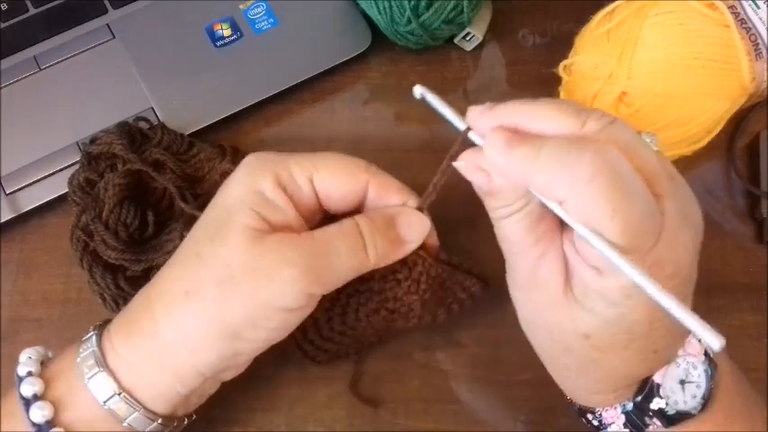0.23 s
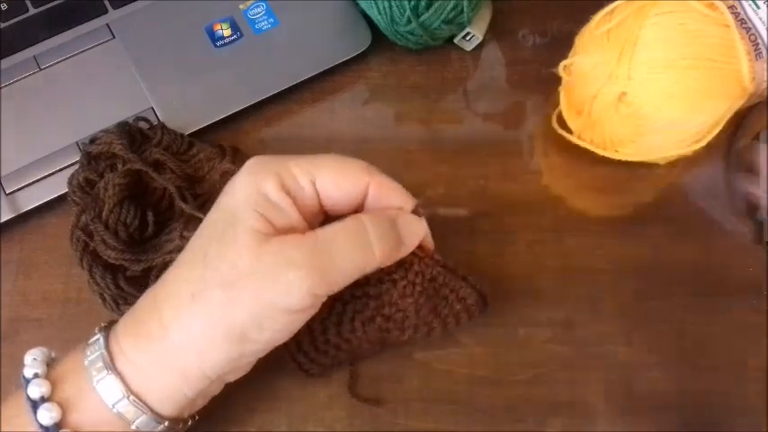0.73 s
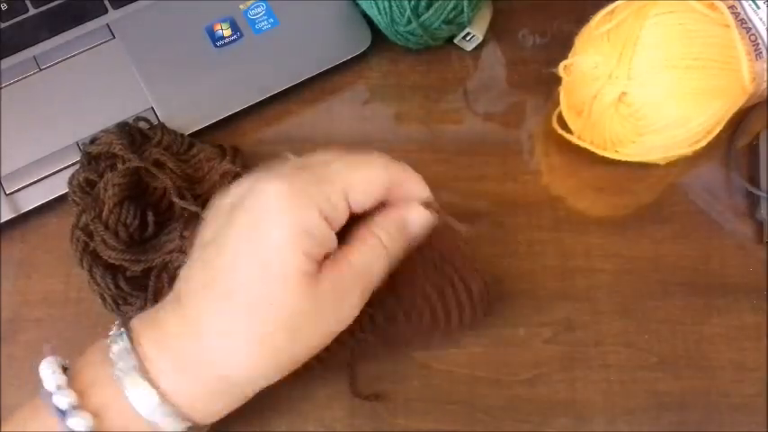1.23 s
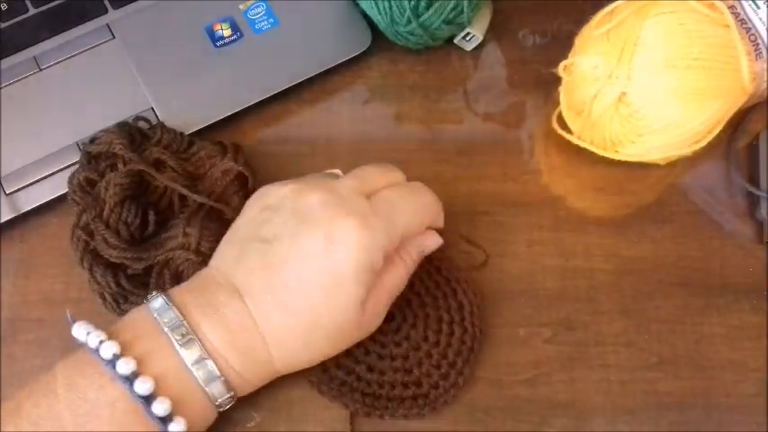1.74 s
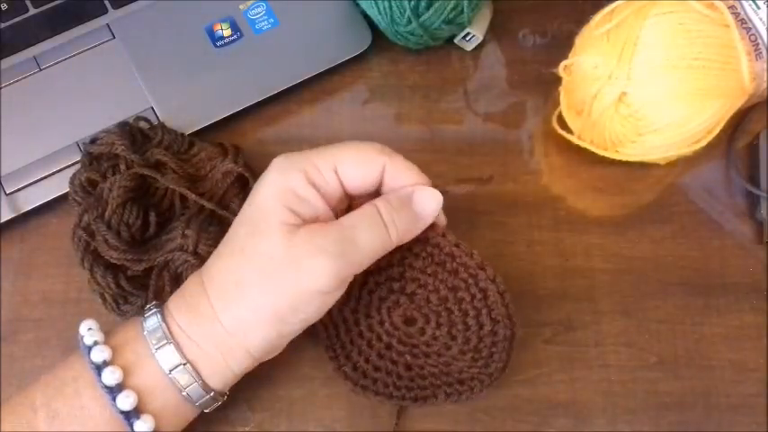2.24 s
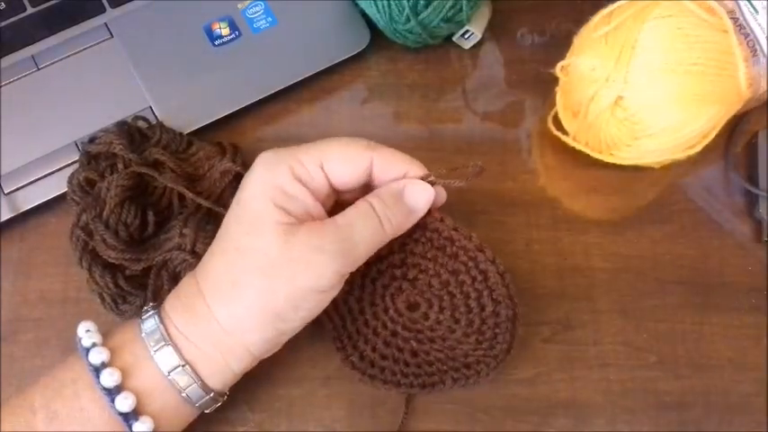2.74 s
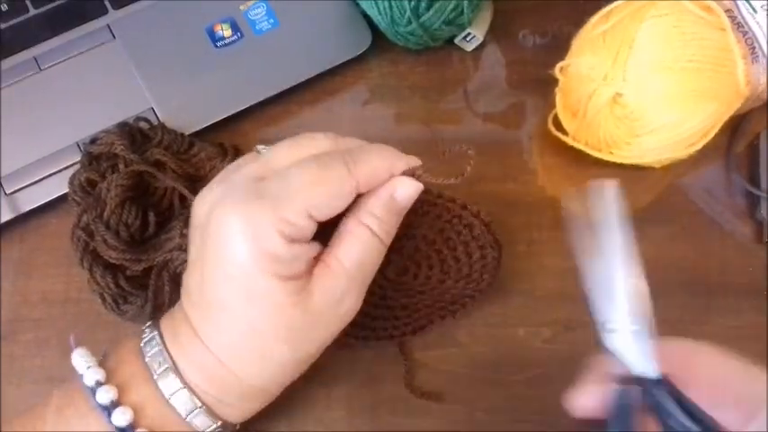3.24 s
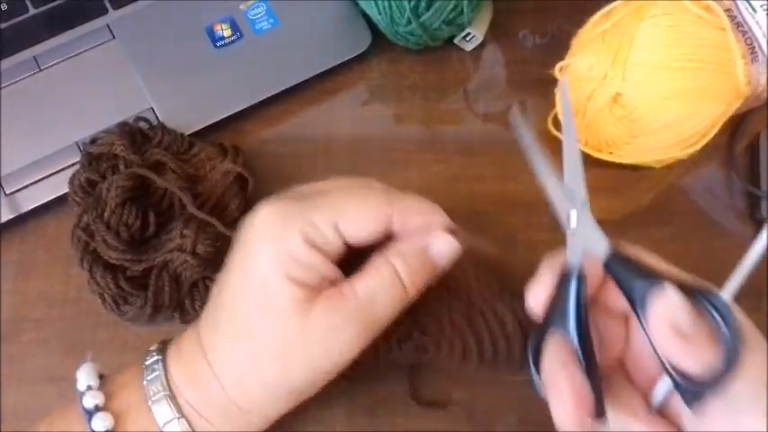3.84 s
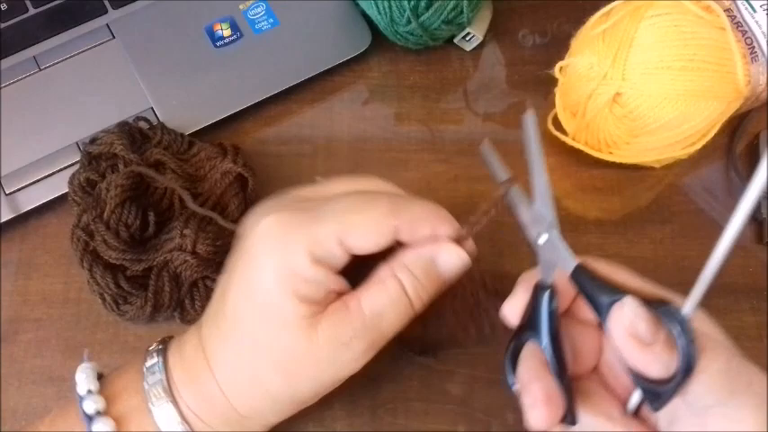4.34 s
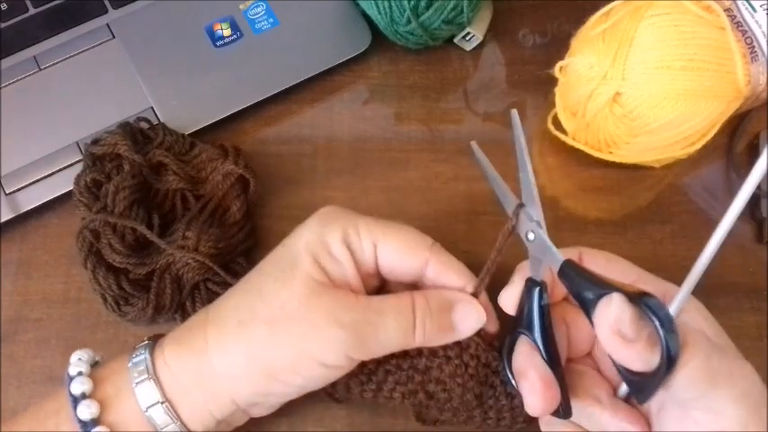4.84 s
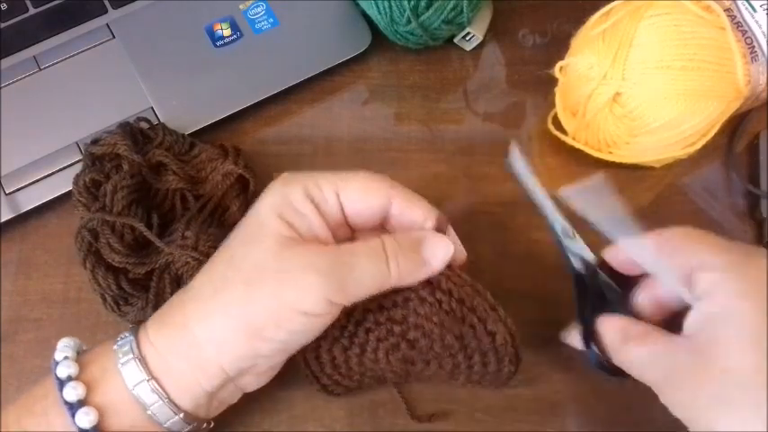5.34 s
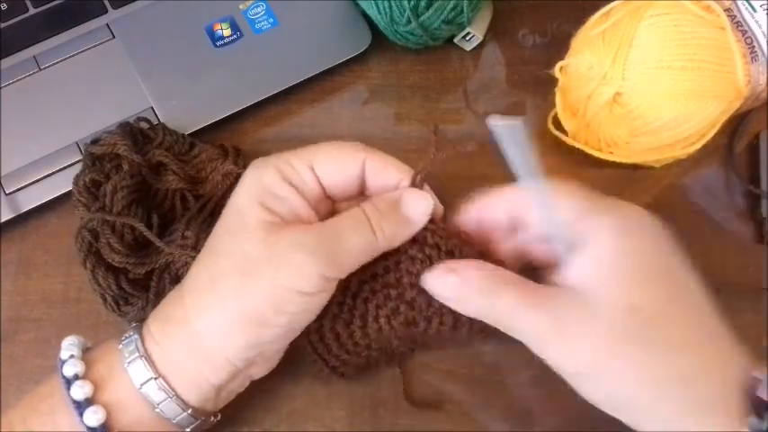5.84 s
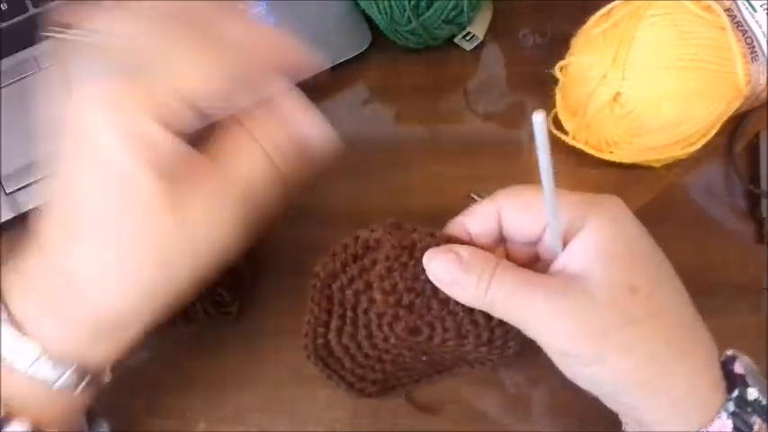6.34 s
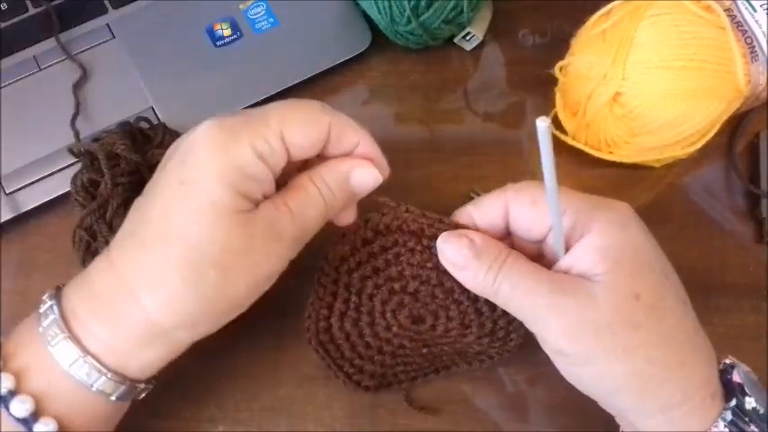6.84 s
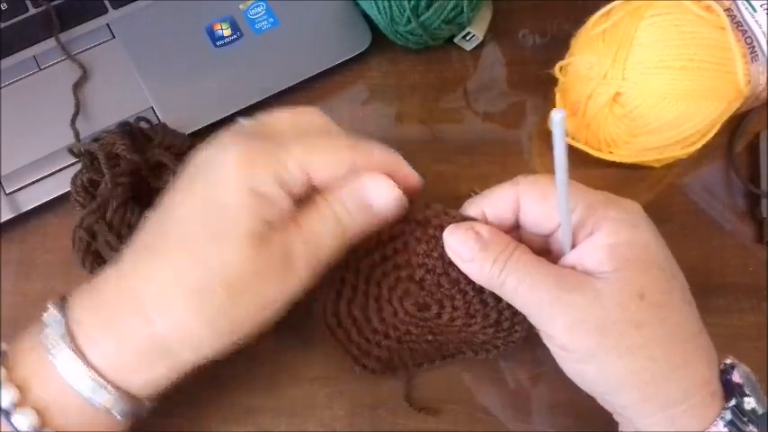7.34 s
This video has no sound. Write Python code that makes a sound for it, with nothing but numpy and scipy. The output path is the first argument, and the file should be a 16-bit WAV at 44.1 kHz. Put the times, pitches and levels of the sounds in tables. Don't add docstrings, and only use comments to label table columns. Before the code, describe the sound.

Close steel clatter in a cup, a hiss as scissors slide out, tiny blade clicks through yarn, and a sharp knock on wood.

```python
import sys
import numpy as np
from scipy import signal
from scipy.fft import rfft, irfft, next_fast_len
from scipy.io import wavfile
from scipy.ndimage import map_coordinates

SR = 44100
rng = np.random.default_rng(int(sys.argv[2]) if len(sys.argv) > 2 else 0)


def pcm_store(signal):
    levels = np.round(np.clip(np.atleast_2d(signal), -1, 1) * 32767)
    wavfile.write(sys.argv[1], SR, levels.astype(np.int16).T)


def elevation(decibels):
    levels = np.asarray(decibels, float)
    return 10 ** (levels / 20)


N = 334719


def unit(x):
    return x / np.sqrt(np.mean(x ** 2) + 1e-20)


def along(points, hz):
    f, value = np.transpose(points)
    return np.interp(np.log(hz + 1), np.log(f + 1), value)


def gain(rows):
    s, db = np.transpose(rows)
    return elevation(np.interp(np.arange(N) / SR, s, db, -140, -140))


def filtered(x, response):
    m = next_fast_len(x.shape[-1] + 8192)
    spectrum = rfft(x, m) * response(np.fft.rfftfreq(m, 1 / SR))
    return irfft(spectrum, m)[..., :x.shape[-1]]


def wobble(rate):
    knots = rng.standard_normal(int(N * rate / SR) + 4)
    return map_coordinates(knots, [np.arange(N) * rate / SR])


def add(track, s, sound):
    track[round(s * SR):][:len(sound)] += sound


def ring(hz, db, t60, chatter_s, blow, crack):
    t = np.arange(int(0.3 * SR)) / SR
    uneven_db = 2.0 * rng.standard_normal((len(hz), 1))
    level = elevation(db[:, None] + uneven_db - 60 * t / t60[:, None])
    modes = (level * np.sin(2 * np.pi * hz[:, None] * t)).sum(0)

    def colour(f):
        below = np.clip(f / hz[0], 0, 1) ** 3
        above = np.clip(hz[-1] / (f + 1), 0, 1) ** 4
        return elevation(along(np.transpose([hz, db]), f)) * below * above

    snap = unit(filtered(rng.standard_normal(len(t)), colour)) * elevation(-60 * t / 0.0069)
    onset = 1 - np.exp(-(t / 0.0005) ** 2)
    body = (modes / np.abs(modes).max() + crack * snap) * onset

    part = np.clip(t / max(chatter_s, 0.001), 0, 1)
    swell = (1 - part) ** 0.9 if blow else np.sin(np.pi * part)
    contacts = rng.standard_normal(len(t)) * (rng.random(len(t)) < 0.07)
    contacts *= swell * 0.13
    contacts[0] = blow
    sound = signal.fftconvolve(contacts, body)[:len(t)]
    return sound / (np.abs(sound).max() + 1e-9)


def strikes(table, modes, focus_db, damping, blow, crack, low_db, bright_db, chatter_s):
    usual_db, low_fades = -37, 0.41
    focus_octaves = 0.06
    track = np.zeros(N + SR)
    hz, db, t60 = np.transpose(modes)
    for s, peak_db, strongest_hz, *colour in table:
        hollow_db, hard_db = colour or (0, 0)
        near = focus_db * np.exp(-(np.log2(hz / strongest_hz) / focus_octaves) ** 2)
        low = low_db + hollow_db - low_fades * (peak_db - usual_db)
        bright = np.where(hz > 6000, bright_db + hard_db, 0)
        tilt = np.where(hz < 2500, low, bright)
        start = s - (1 - blow) * 0.4 * chatter_s
        sound = ring(hz, db + near + tilt, damping * t60, chatter_s, blow, crack)
        add(track, start, elevation(peak_db) * sound)
    return track[:N]


def grainy(spectrum, rough_db):
    clumps_db = rough_db * wobble(30) + 0.56 * rough_db * wobble(400)
    grains = rng.standard_normal(N) * elevation(clumps_db)
    return unit(filtered(grains, lambda f: elevation(along(spectrum, f)) * (f > 200)))


def strokes(rows):
    t = np.arange(N) / SR
    return sum(elevation(db - 12.5 * ((t - s) / half_s) ** 2) for s, half_s, db in rows)


# pitch_hz, level_db, t60_s
CUP_MODES = [(1530, 0, 0.029), (1658, -7, 0.11), (2170, -3.5, 0.13), (2927, -8.5, 0.11), (3020, 1, 0.045),
             (3190, -8.5, 0.12), (3590, 3, 0.058), (4100, -7, 0.094), (4150, 3, 0.05), (4240, -5.5, 0.081),
             (4386, -1, 0.055), (4980, -10, 0.042), (5480, -9, 0.049), (6965, -13.5, 0.013),
             (7820, -18.5, .05), (8540, -27, 0.065), (8950, -20.5, 0.027), (11860, -29.5, 0.024),
             (12900, -28.5, .03), (14710, -36.5, .03)]
# start_s, peak_db, strongest_hz, hollowness_db, hardness_db
CLINKS = [(1.2979, -20.5, 4110, -5.5, -10.5), (1.3049, -14.5, 4240, 5, 1.5), (1.3085, -24, 3950, 0, 11.5),
          (1.3124, -18, 4175, 7, -5), (1.319, -31.5, 1658, 5, -9), (1.4057, -31, 4150, 0, -20.5),
          (1.4166, -31.5, 4080, 2, -5), (1.5609, -35, 2160, -11, -6), (2.2522, -48, 4140, -3.5, 5.5),
          (2.2972, -47, 3590, 3, -1), (2.3976, -21.5, 3020, 4, 3.5), (2.411, -26.5, 3020, 1, -2),
          (2.4454, -20.5, 3200, -5, -13), (2.4662, -22, 4080, 8.5, -5), (2.5885, -13.5, 3057, 5.5, 5),
          (2.6803, -26.5, 3020, 6.5, 6), (3.3232, -42, 4400, -13, -2.5), (3.3348, -35.5, 4000, -16, 11)]


def clinks():
    return strikes(CLINKS, CUP_MODES, focus_db=12, damping=0.62, blow=0.93, crack=0.28,
                   low_db=1, bright_db=2, chatter_s=0.022)


# start_s, peak_db, strongest_hz
SCRAPES = [(1.268, -38.5, 4020), (1.281, -34, 4030), (1.3294, -49, 4160), (1.3494, -41.5, 3840),
           (1.3644, -43, 4500), (1.372, -45.5, 4400), (1.4294, -35.5, 4060), (1.443, -35, 4170),
           (1.4551, -21, 4260), (1.4621, -25, 4370), (1.5194, -50, 4500), (1.5894, -43, 4030),
           (1.6774, -49, 4620), (1.6881, -37.5, 4250), (1.757, -41, 2970), (1.777, -31, 4200),
           (1.785, -49.5, 3020), (2.0837, -53, 3880), (2.1226, -56, 4440), (2.1575, -45.5, 4070),
           (2.1894, -52, 4000), (2.2044, -52.5, 4110), (2.6244, -38, 3030), (2.69, -39, 3020),
           (2.824, -46, 4000)]


def scrapes():
    return strikes(SCRAPES, CUP_MODES, focus_db=13.5, damping=0.58, blow=0, crack=0.88,
                   low_db=-3.0, bright_db=-5.5, chatter_s=0.023)


# start_s, peak_db, strongest_hz
TAPS = [(0.1997, -61, 1960), (0.6786, -58, 3910), (1.3907, -27, 4120), (1.506, -32, 3750),
        (2.368, -47, 4100), (2.5446, -35.5, 4150), (2.569, -35.5, 4100), (2.6054, -23.5, 3160),
        (3.052, -53, 3600), (4.5236, -49.5, 3600), (4.7696, -55, 3630), (5.6025, -27.5, 2160)]


def taps():
    return strikes(TAPS, CUP_MODES, focus_db=6.5, damping=0.13, blow=0.9, crack=0.13,
                   low_db=-3.5, bright_db=-2.0, chatter_s=0.00396)


# time_s, level_db
STIRRING = [
    [(1.25, -75.5), (1.316, -79), (1.436, -53), (1.468, -62.5), (1.596, -63.5), (1.76, -65), (1.85, -84)],
    [(2.05, -68.5), (2.152, -68), (2.302, -66.5), (2.416, -60.5), (2.532, -55.5), (2.568, -58),
     (2.724, -65.5), (2.874, -66.5), (2.95, -85)],
]
# loudest_s, half_length_s, level_db
DRAWN = [
    (1.46, 0.2, -75.5),
    (2.72, 0.173, -71.5),
]
# pitch_hz, level_db per Hz
STEEL_SLIDE = [(2940, -40), (5000, -7), (6440, -11.5), (6960, 4), (7480, -2.5), (9960, -14.5),
               (11200, -12.5), (12800, -4), (15700, -21)]
# pitch_hz, level_db per Hz
RUB = [(400, 0), (1500, -9), (2800, -9), (4100, -2), (4800, -10), (6000, -25), (12000, -44.5)]


def rummage():
    stir = sum(gain(rows) for rows in STIRRING)
    jolts_db = 14 * rng.random(N) * (rng.random(N) < 0.02)
    chatter = unit(rng.standard_normal(N) * elevation(jolts_db))

    def cup(f):
        total = 0
        for centre, db, t60 in CUP_MODES:
            width = 5 / t60
            total = total + elevation(db) * 1j * f * width / (centre * centre - f * f + 1j * f * width)
        return total

    rattle = filtered(chatter * stir, cup) / np.std(filtered(chatter, cup))
    hiss = strokes(DRAWN) * grainy(STEEL_SLIDE, rough_db=1.3)
    rub = stir * elevation(-5) * grainy(RUB, rough_db=3)
    return elevation(-9) * rattle + rub + hiss


# start_s, peak_db, pitch_hz
THUDS = [(1.267, -53, 488), (1.308, -53.5, 280), (1.405, -58, 630), (1.458, -56.5, 455), (1.558, -54, 298),
         (1.742, -58, 473), (2.089, -61, 411), (2.14, -59, 200), (2.393, -60.5, 285), (2.457, -52.5, 777),
         (2.551, -57, 121), (2.589, -54.5, 197), (2.847, -66.5, 163), (5.605, -52, 284)]


def thuds():
    track, t = np.zeros(N + SR), np.arange(int(0.2 * SR)) / SR

    def dull(f):
        return 1 / (1 + (130 / (f + 1)) ** 2) / (1 + (f / 700) ** 2)

    for s, db, hz in THUDS:
        puff = unit(filtered(rng.standard_normal(len(t)), dull))
        envelope = elevation(db - 4 - 60 * t / 0.17) * (1 - np.exp(-t / 0.0021))
        note = np.sin(2 * np.pi * hz * t)
        add(track, s, envelope * (1.2 * note + 1.44 * puff))
    return track[:N]


# pitch_hz, level_db, t60_s
BLADE_MODES = [(1858, 0, 0.11), (2800, 1.5, 0.044), (3450, 1, 0.095), (3750, -4, 0.25), (4100, 3, 0.065),
               (4416, -6, 0.12), (4620, -12, 0.22), (5640, -35.5, .05), (7450, -28, 0.033),
               (7060, -16, 0.25), (11330, -18, 0.15), (13460, -15.5, .06)]
# start_s, peak_db, strongest_hz
TICKS = [
    (2.8459, -43, 4530),
    (2.9108, -56.5, 3600),
]


def ticks():
    return strikes(TICKS, BLADE_MODES, focus_db=14, damping=0.44, blow=1, crack=0.45,
                   low_db=-4.5, bright_db=7.5, chatter_s=0.012)


# start_s, peak_db, strongest_hz
SNIPS = [(3.2594, -64.5, 3750), (3.7564, -52, 4060), (3.8394, -58.5, 3680), (3.8591, -59.5, 4110),
         (3.8851, -65, 4090), (3.9135, -63, 3400), (4.0094, -63, 4110), (4.4638, -48.5, 4120),
         (4.7386, -52, 4400), (5.1133, -54, 3450)]


def snips():
    return strikes(SNIPS, BLADE_MODES, focus_db=12, damping=0.24, blow=0.72, crack=0.92,
                   low_db=-14, bright_db=-9, chatter_s=0.015)


# start_s, pitch_hz, level_db, t60_s
PING = [
    (2.606, 10600, -62, .33),
]


def ping():
    t = np.arange(N) / SR
    track = np.zeros(N)
    for s, hz, db, t60 in PING:
        track += elevation(db - 60 * abs(t - s) / t60) * (t > s) * np.sin(2 * np.pi * hz * t)
    return track


# loudest_s,
# half_length_s, level_db
HANDS = [
    (.68, .15, -66.5),
    (3.29, 0.15, -72),
    (3.87, .17, -72),
    (4.5, .1, -73),
    (4.75, 0.16, -73),
    (5.08, 0.11, -73),
    (6.3, 0.17, -76.5),
]
# pitch_hz, level_db per Hz
YARN = [(400, -30), (1800, -16), (3000, -5), (3900, 0), (4600, -4), (5400, -22), (12000, -45)]


def hands():
    return elevation(-5) * strokes(HANDS) * grainy(YARN, rough_db=5)


# start_s, peak_db, wood_db, brightness_db, crack_t60_s
LAID = [
    (5.6011, -23.5, -18, -36, 0.039),
    (5.6694, -19, -10.5, -27.5, 0.019),
    (5.672, -10.5, -31.5, -33, 0.059),
    (5.687, -17.5, -13.5, -43, 0.045),
    (5.6983, -28, -7.5, -35.5, 0.084),
]
# pitch_hz, level_db, t60_s
TABLE_MODES = [(437, -14, 0.13), (600, -16.5, 0.1), (1070, -15.0, 0.11), (1255, -25.5, 0.4),
               (1570, -21.5, 0.27), (2515, -18.5, 0.081), (2850, -6, 0.11), (3187, -15.5, 0.28),
               (3297, 2, 0.04), (3796, 0.5, 0.098), (3903, -12, 0.14), (3998, -1, 0.14),
               (4194, -5.5, 0.1445), (4600, 2.5, 0.093), (4250, -13.5, 0.19), (4540, 7.0, 0.12),
               (2240, -16.5, .06), (4570, -17, 0.034), (7400, -29.5, .04)]
# pitch_hz, level_db per Hz
CRACK = [(88, -68.5), (150, -38.5), (609, -20.5), (784, -20), (1490, -14.5), (1850, -16.5), (2380, -19.5),
         (3250, -4.5), (4100, 0), (4790, -7.5), (5930, -38), (8100, -29.5), (15700, -63)]


def laid_down():
    track, t = np.zeros(N + SR), np.arange(int(0.3 * SR)) / SR
    hz, level, t60 = np.array(sorted(TABLE_MODES)).T
    choked_t60 = 0.22 * np.clip(t60, 0.02, 0.15)
    for s, db, wood_db, bright_db, crack_t60 in LAID:
        def tilt(f):
            bright = (bright_db + 35.5) * np.clip((f - 4900) / 1500, 0, 1)
            return np.where(f < 1400, wood_db + 24, bright)

        noise = rng.standard_normal(len(t))
        crack = unit(filtered(noise, lambda f: elevation(along(CRACK, f) + tilt(f))))
        crack *= elevation(-60 * t / abs(crack_t60)) * (1 - np.exp(-(t / 0.001) ** 2))
        modes = ring(hz, level + tilt(hz), choked_t60, chatter_s=0.007, blow=0.91, crack=0.399)
        add(track, s, elevation(db) * (0.52 * modes + 0.53 * crack))
    return track[:N]


# pitch_hz, t60_s
WALLS = [(200, 1), (1000, 0.9), (4000, 0.47), (8000, 0.45), (14000, 0.3)]


def room(x):
    wet, hop = np.zeros((2, N + 2 * SR)), SR // 3
    for start in range(0, N, hop):
        common, apart = rng.standard_normal(SR // 2), rng.standard_normal(SR // 2)
        pair = [common + 0.065 * apart, common - 0.044 * apart]
        hz, t, z = signal.stft(pair, SR, nperseg=256)
        t60 = along(WALLS, hz)[:, None]
        next_room = elevation(-25 - 60 * t / (2.4 * t60))
        decay = elevation(-60 * t / t60) + next_room
        tail = signal.istft(z * decay, SR, nperseg=256)[1]
        tail = tail / np.linalg.norm(tail[0])
        piece = signal.fftconvolve(x[None, start:start + hop], tail, axes=1)
        wet[:, start + 300:start + 300 + piece.shape[1]] += piece
    return wet[:, :N]


# pitch_hz, level_db per Hz
TONE = [(18, -50), (32, -20), (62, -11), (115, -1), (160, -4), (260, -2), (400, -1), (630, -3), (1000, -3),
        (1600, -4), (2200, -7), (4100, -10), (4950, -20), (15800, -21)]
# pitch_hz, side_minus_mid_db
WIDTH = [(60, -2.5), (150, -4), (380, -5.5), (950, -5), (2380, -4), (5980, -1), (15000, 2)]
# pitch_hz, level_db
WHINE = [
    (119, -85.5),
    (7050, -95),
]


def room_tone():
    def mid_and_side(hz):
        return elevation(along(TONE, hz) + np.array([0 * hz, along(WIDTH, hz)]))

    mid, side = filtered(rng.standard_normal((2, N)), mid_and_side)
    level = elevation(-72 + 0.1 * wobble(1.5))
    air = level * np.array([mid + side, mid - side]) / np.std(mid)
    t = np.arange(N) / SR
    lines = np.zeros(N)
    for hz, db in WHINE:
        strength = elevation(db - 3.0 + 1.5 * wobble(9))
        lines += strength * np.sin(2 * np.pi * hz * t + 0.9 * wobble(9.4))
    return air + lines


def scene():
    cup = clinks() + scrapes() + taps() + rummage() + thuds()
    scissors = ticks() + snips() + ping() + hands()
    near, laid = cup + scissors, laid_down()
    into_room = elevation(-22) * near + elevation(-15.5) * laid
    return near + laid + room(into_room) + room_tone()


# pitch_hz, width_hz, depth (0-1)
NOTCHES = [(9970, 790, 0.5), (15700, 400, .6)]


def band_limit(x):
    return signal.sosfilt(signal.butter(12, 16160, fs=SR, output="sos"), x)


def record(dry):
    def port(f):
        dips = sum(depth * np.exp(-((f - hz) / width) ** 2) for hz, width, depth in NOTCHES)
        return (f < 16100) * (1 - dips)

    mix = filtered(dry, port) - 0.0002
    return band_limit(mix)


dry = scene()
out = record(dry)
pcm_store(out)
```